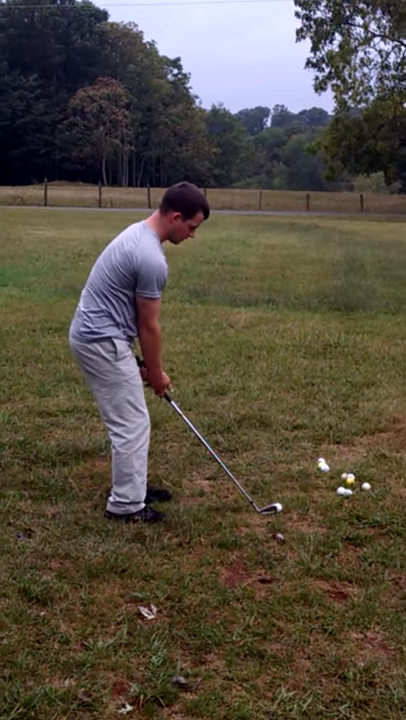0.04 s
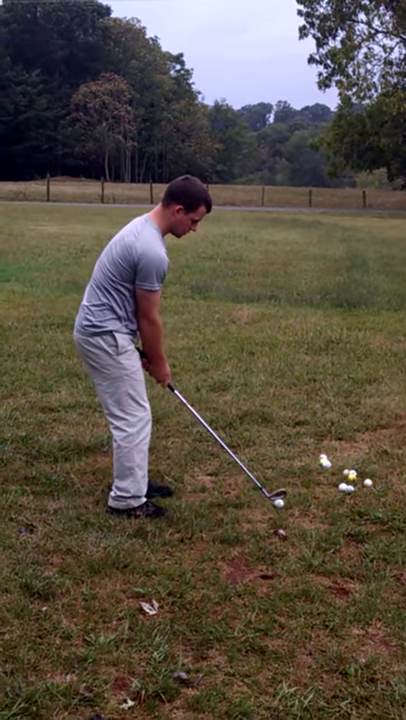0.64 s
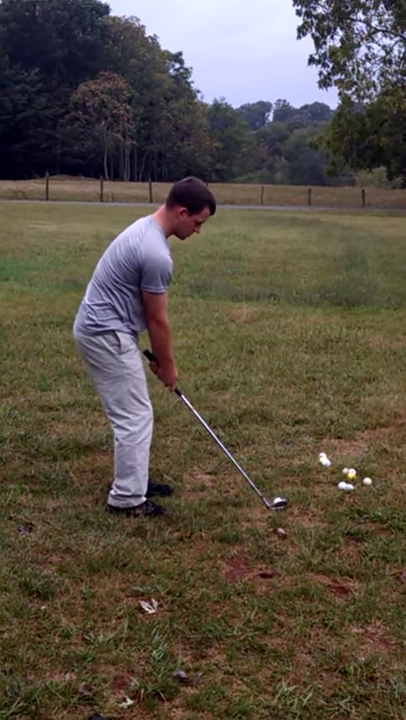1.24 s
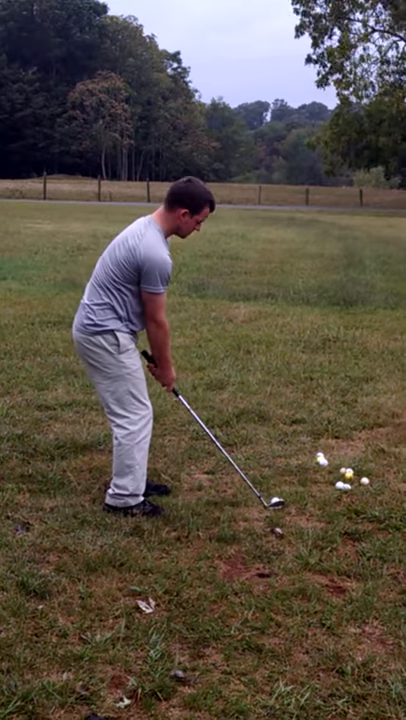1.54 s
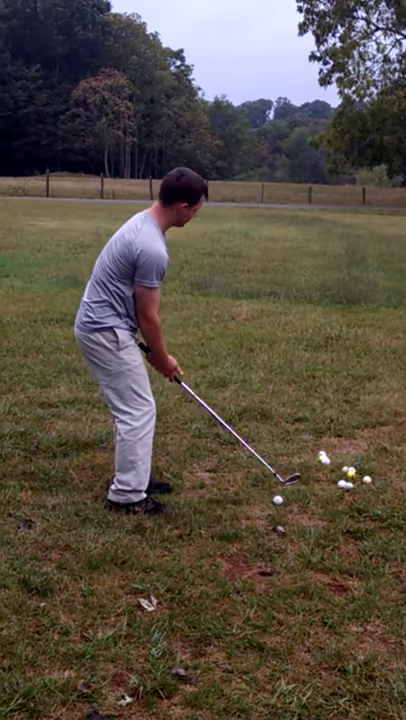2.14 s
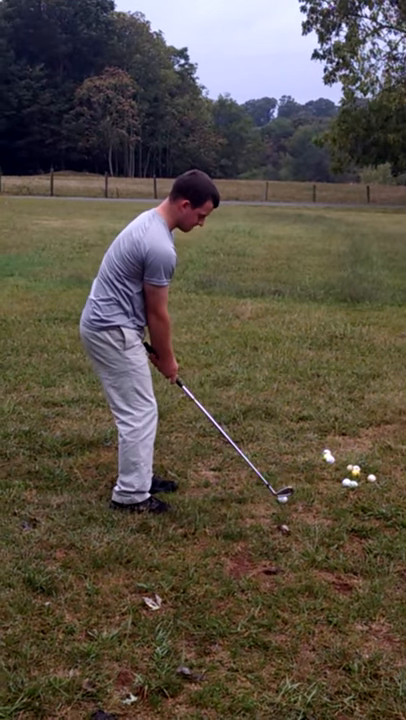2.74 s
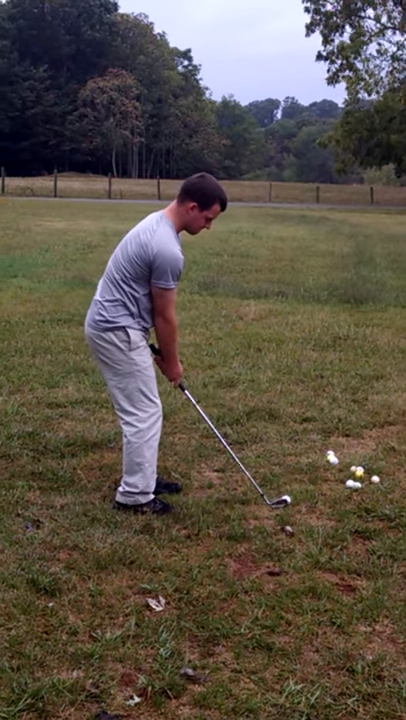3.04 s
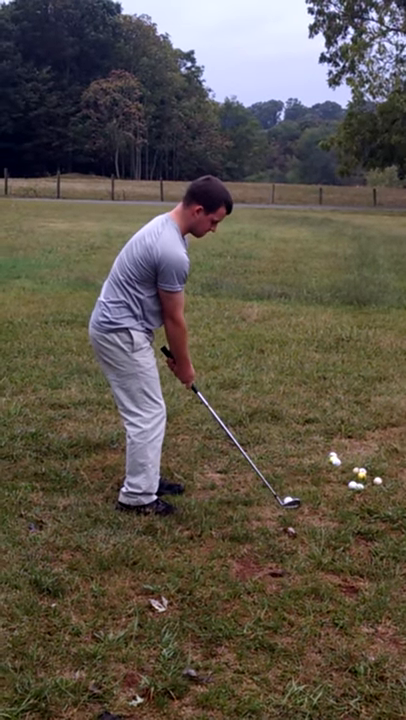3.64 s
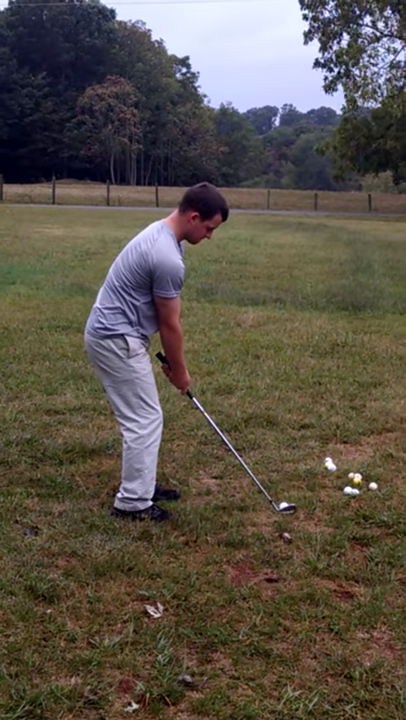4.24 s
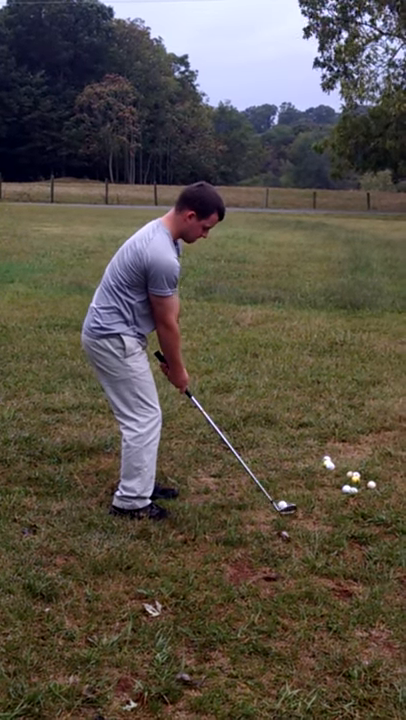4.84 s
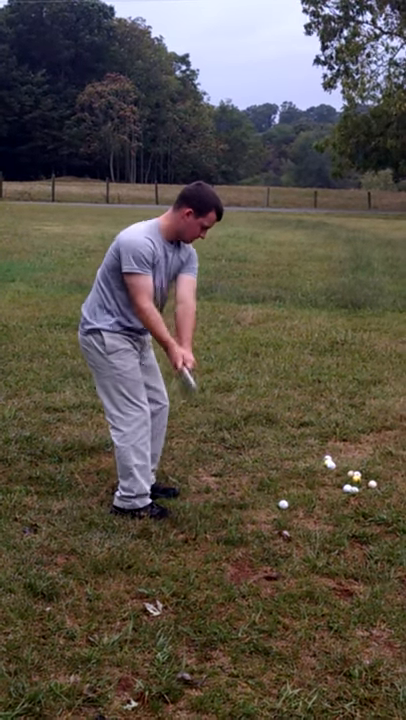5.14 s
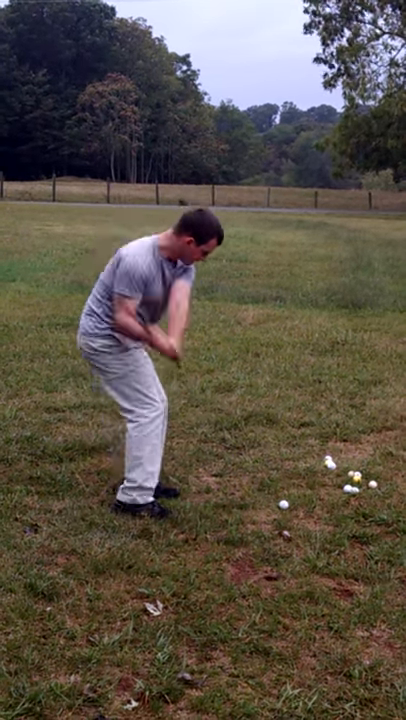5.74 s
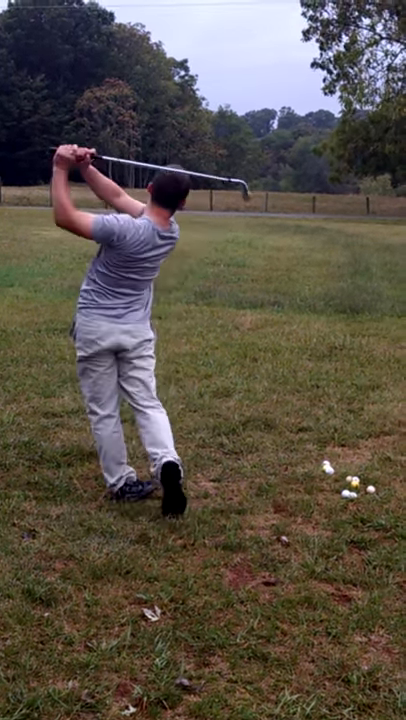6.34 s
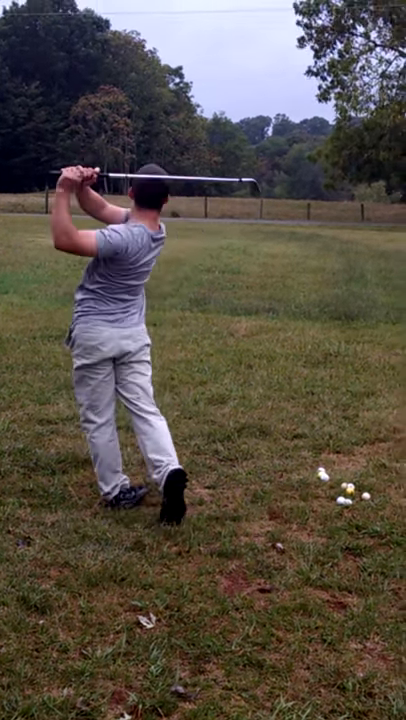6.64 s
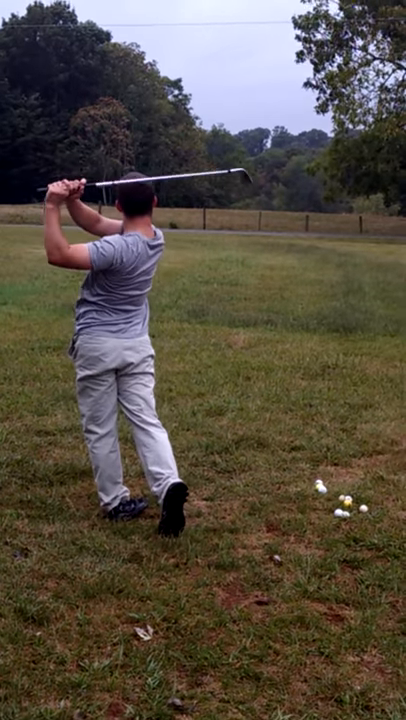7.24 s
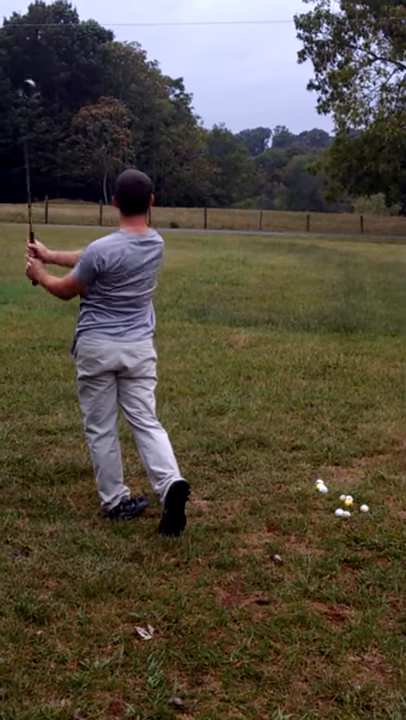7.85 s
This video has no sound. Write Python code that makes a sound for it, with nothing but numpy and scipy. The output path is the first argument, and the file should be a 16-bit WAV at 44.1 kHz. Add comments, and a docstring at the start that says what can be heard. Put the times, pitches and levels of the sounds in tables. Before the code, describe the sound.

Low wind rumbles on the microphone in an open meadow, with irregular gusts and soft thumps, strongest from about 0.5 to 1.5 seconds and returning around 3 and 5 seconds. Far behind it, trees hiss, insects shrill and a machine drones very faintly. A quiet cricket trills roughly every three quarters of a second. A small bird gives a thin, high chirp near 0.9 seconds and a few fainter ones later. Tiny dry ticks come at about 4.6, 5.3 and 6.5 seconds. At 5.9 seconds a golf club whooshes quickly a few metres away and strikes the ball: one loud, bright crack over a short hollow knock, with a brief tear of grass. The hit overloads the microphone, so the background drops at once, then creeps back with lighter wind until the end at about 8 seconds.

```python
"""A golfer swings an iron and strikes the ball on an open meadow, a few metres from a small camera.
The shaft whooshes in, the head tears the grass, and the strike cracks over a hollow knock. Far off,
trees hiss, a machine drones and insects shrill; a cricket sings nearer, a small bird calls thinly, dry
stalks and the grip tick. Wind rumbles on the microphone. The crack overloads the recorder, whose gain
ducks and creeps back."""
import sys
import numpy as np
from scipy import signal
from scipy.fft import rfft, irfft, next_fast_len
from scipy.io import wavfile
from scipy.ndimage import map_coordinates

SR = 44100
rng = np.random.default_rng(int(sys.argv[2]) if len(sys.argv) > 2 else 0)


def dump_mix(stems):
    """Bounce the given channels to the path in sys.argv[1] as a 16-bit WAV at rate SR."""
    frames = np.atleast_2d(stems).T  # one column per channel
    limited = np.clip(frames, -1, 1)  # hard clip at full scale
    pcm = np.round(limited * 32767).astype(np.int16)
    wavfile.write(sys.argv[1], SR, pcm)


N = 357210

# How the camera body shapes sound at its two microphone ports. Each row: frequency in Hz, left-right
# correlation, phase lead of the left in radians, pan in dB (left over right, here and below).
MIC_PORTS = [(200, 0.086, 0, -2), (700.05, 0.71, 0.2577, -1), (1207, 0.924, .5, -1.19),
             (1723, 0.96, 0, -1.2688), (2065, 1, -0.84, -3), (2394, 0.453, -2.5, -2), (2709, 0.99, -3, 0.5),
             (3057, 1, -3, -3.5), (3430, 0.626, -2, 3.9), (4042, 0.7089, -1.63, -3), (4700, 0.688, 0.6, 2),
             (5164, 0.4, 1.5, -1.5), (6070, 0.5, 3.5, 1.5), (7000, 0.0589, 7.5, -2),
             (7920, 0.7515, 8, 2.33), (8600, .1, 8, 0.5), (9480, 0.6, 12.5, -0.5), (10964, 0.646, 15, 1.37),
             (13151, 0.09707, 21, 0)]
# Distant trees and open air. Each row: frequency in Hz, relative density in dB.
TREE_SPECTRUM = [(30, -1), (120, -2.5), (340, -4.5), (500, -4.5), (750, -7), (1100, -6), (1400, -3.5),
                 (1700, 1.04), (2000, -0.5), (2400, -11), (2850, -12), (3400, -11.5), (4000, -11),
                 (6000, -13), (7300, -14.5), (9000, -17.5), (12500, -20.5), (15000, -28)]
# The breeze in those trees. Each row: time in seconds, level in dB.
TREE_LEVELS = [(0, -46.5), (1.5, -46.5), (3, -47), (4.2, -48.5), (5.5, -48), (6.5, -46.5), (8.1, -47.5)]
# Far insect choruses. Each row: centre in Hz, half-width in Hz, relative level in dB, pan in dB.
CHORUS_BANDS = [(4674, 270, -1, -1), (4958.4, 438, -3, -4.5), (6646.4, 167, -25.5, 0)]
# Their rise and fall. Each row: time in seconds, level in dB.
CHORUS_LEVELS = [(0, -57.5), (2.8, -56), (4.3, -60), (5.2, -58.5), (6.6, -54), (8.1, -54)]
# The nearer cricket's trills. Each row: start in seconds, level in dB.
CRICKET_TRILLS = [(0.28, -61), (1.04, -67), (1.71, -61), (2.59, -60.5), (3.34, -60.5), (4.16, -65.5),
                  (4.94, -61), (5.62, -61.5), (6.4, -63), (7.08, -62), (7.86, -64)]
# Bird notes from the trees. Each row: start in seconds, length in seconds, lowest pitch in Hz,
# level in dB, roughness as a share of the pitch.
BIRD_NOTES = [(0.9248, 0.0154, 7320, -45.5, 0.0085), (0.9387, 0.0168, 8230, -47, 0.0071),
              (1.907, 0.0829, 7311, -62, 0.01929), (2.301, 0.07, 6949, -57.5, 0.0101),
              (4.394, .074, 6959, -62, 0.007604), (7.615, 0.053, 7210, -58.5, 0.091)]
# The steady draught on the microphone. Each row: time in seconds, level in dB.
DRAUGHT_LEVELS = [(0, -28.5), (.45, -32), (1.0, -33.5), (1.9, -32), (2.4, -34.5), (3.72, -32.5),
                  (3.85, -48), (4.75, -45.5), (5.2, -36.5), (5.55, -41), (6.3, -36.5), (7.1, -44.5),
                  (8.1, -48)]
# Gusts on top of it. Each row: crest in seconds, level in dB, seconds to fall 10 dB (sign ignored).
WIND_GUSTS = [(.57, -16.5, -0.024), (.63, -25.5, -0.38), (.765, -40.5, 0.39), (.836, -21.5, 0.1857),
              (.888, -23, -0.02), (.965, -30.5, 0.07), (1.06, -22, 0.0755), (1.13, -21.5, 0.0222),
              (1.22, -20, 0.1116), (1.385, -23, 0.08), (1.47, -28, -0.04), (1.62, -30, -0.41),
              (2.58, -27.5, -0.01), (2.70, -31.5, 0.18), (2.78, -26.5, 0.0878), (2.88, -28.5, -0.0343),
              (3.03, -26, 0.14), (3.29, -25, 0.0726), (3.385, -30, 0.0732), (3.461, -28, 0.014),
              (3.54, -26.5, 0.07), (3.635, -30, 0.07), (3.895, -38.5, -0.25), (3.968, -31, -0.2652),
              (4.44, -25, -0.0478), (4.86, -27, 0.0469), (4.93, -24.5, 0.0438), (4.99, -24, 0.1161),
              (5.07, -30.5, 0.0875), (5.44, -37, 0.21), (5.62, -31.5, -0.02), (5.78, -34, 0.0285),
              (5.9, -34.5, -0.1), (6.08, -29.5, 0.1), (6.52, -33, 0.08), (6.81, -35, 0.07),
              (7.455, -34.5, 0.18), (7.71, -37, -0.06), (7.79, -38.5, 0.05)]
# Slow buffeting and finer turbulence at the ports. Each row: frequency in Hz, relative density in dB.
BUFFET_SPECTRUM = [(8, -54), (22, -0.5), (55, 1), (85, -4), (120, -9), (220, -50), (450, -63), (900, -100)]
TURBULENCE_SPECTRUM = [(40, -38), (120, -0.5), (200, -6.5), (300, -14.5), (480, -31), (900, -55.5),
                       (2000, -100)]
# Single eddies that thump the ports. Each row: time in seconds, peak in dB, width in seconds.
EDDY_THUMPS = [(.556, -10, 0.00245), (.56, -10.5, 0.0065), (0.583, -9.5, 0.00249), (.612, -7.5, 0.00594),
               (0.632, -12.5, 0.00273), (.653, -13, 0.0046), (.679, -13, 0.0053), (.756, -19.5, 0.0045),
               (.832, -12, 0.001884), (.838, -11.5, 0.00896), (.843, -16, 0.001756), (.853, -15, 0.00317),
               (.887, -14, 0.0034), (1.035, -17.5, 0.003631), (1.146, -15.5, 0.00868), (1.195, -12.5, .006),
               (1.213, -13.5, .004), (1.23, -8.5, 0.00271), (1.276, -16, 0.00458), (1.302, -14.5, .006),
               (1.349, -18, 0.005627), (1.399, -14, 0.00289), (1.461, -21, 0.0036), (1.595, -19.5, 0.0057),
               (2.02, -18.5, 0.00595), (2.171, -24.5, 0.0036), (2.187, -19, 0.00115), (2.191, -6, 0.00274),
               (2.729, -21, 0.00372), (2.833, -21, 0.0068), (2.965, -19.5, 0.0043), (3.026, -16.5, 0.0056),
               (3.067, -17, 0.0058), (3.213, -15.5, 0.0061), (3.286, -14, 0.00271), (3.301, -17, 0.0037),
               (3.341, -16, 0.0057), (3.519, -12.5, 0.0039), (3.535, -15.5, 0.00245),
               (3.549, -17.5, 0.00268), (4.02, -22.5, 0.0071), (4.429, -18, 0.00274),
               (4.453, -15.5, 0.00344), (4.9, -13, 0.00447), (4.913, -14.5, 0.00455),
               (4.945, -12, 0.003219), (5.834, -20, 0.0072), (6.265, -20.5, 0.0073), (6.659, -12.5, 0.0094),
               (7.507, -25, 0.007137), (7.73, -23.5, 0.0069)]
# Ticks of dry stalks and the grip. Each row: start in seconds, level in dB, pitch in Hz, t60 in seconds.
TICKS = [(4.553, -6.5, 8050, 0.000242), (4.554, -51.5, 1400, 0.002966), (5.336, -31.5, 1751, 0.00393),
         (5.3384, -25.5, 1894, 0.0045), (6.541, -24.5, 1892, 0.00148)]
# Air rushing past the club, and grass tearing. Each row: frequency in Hz, relative density in dB.
RUSH_SPECTRUM = [(100, -28), (300, -2), (600, -5), (1150, -7), (1600, 0), (1950, 2.5), (2400, -18),
                 (3200, -17), (8000, -62)]
GRASS_SPECTRUM = [(1000, -18.5), (2500, 6), (4000, -1.5), (5100, 0), (5900, -7.5), (7200, -3.5),
                  (10000, -8.5), (13000, -9), (16000, -34.5)]
# The bright crack of the club face. Each row: frequency in Hz, relative density in dB.
CRACK_SPECTRUM = [(300, -19.5), (900, 8), (1700, 0.5), (2800, -3.5), (4200, -3.5), (5300, -3.5),
                  (6800, -11), (8100, -12), (9400, -4.5), (10400, -13.5), (13000, -14), (16000, -19.5)]
# The strike's tone: a low hollow knock coloured by the ground, with club and ball ringing above.
# Each row: frequency in Hz, level in dB, t60 in seconds, pan in dB.
STRIKE_TONE = [(485, -11.5, .011, 2.5), (610, -16.5, .014, 0), (795, -19, .028, 2), (1000, -23, .028, 1),
               (1590, -19.5, 0.013, 5.5), (1752, -6.5, .015, 1), (1911.4, -3, 0.01197, -3.5),
               (2110, -7.5, 0.0106, -9), (2950, -15.5, .007, -3.5), (3734, -18.5, 0.0125, 9.5),
               (5217.8, -14, 0.0109, -5.5), (6440, -11, .0055, -1.5), (6980, -9.5, .0055, 9.5),
               (9380, -1.5, .004, 1), (11550, -13.5, .007, 3.5)]
# The strike on turf and ball, then fainter echoes and bits of turf landing. Each row: start in seconds,
# gain in dB, relative level of the crack in dB, low-pass cutoff in Hz.
STRIKE_EVENTS = [(5.9262, -14, -8.5, 1500), (5.9291, -15, -1.5, 7020), (5.9306, 5.5, -5.5, 19000),
                 (5.951, -20, -12.5, 5000), (5.968, -27, -17, 3002), (5.9887, -24.5, -20, 3003)]

TIME = np.arange(N) / SR
SPLIT = np.array([[.5], [-.5]])  # shares a level or phase gap between left and right
OPPOSED = np.array([[1], [-1]])  # the right channel in opposite polarity


def amp(db):
    """Decibels to gain."""
    return 10 ** (np.asarray(db) / 20)


def unit(x):
    """Scale to rms 1."""
    return x / np.sqrt(np.mean(x ** 2) + 1e-20)


def along(rows, hz, column=1):
    """One column of a frequency table, read on a log axis."""
    columns = np.transpose(rows)
    return np.interp(np.log(hz + 1), np.log(columns[0] + 1), columns[column])


def level_curve(rows):
    """A table of times and levels as one level per sample."""
    return np.interp(TIME, *np.transpose(rows))


def wobble(rate):
    """A smooth random curve, rate knots a second."""
    knots = rng.standard_normal(int(N * rate / SR) + 4)
    return map_coordinates(knots, [TIME * rate])


def swell(crest_s, rise_db_per_s, fall_db_per_s):
    """A gain that climbs to 1 at the crest and dies away after it."""
    t = TIME - crest_s
    return amp(-np.abs(t) * np.where(t < 0, rise_db_per_s, fall_db_per_s))


def tone(hz):
    """A sine of rms 1 that follows a pitch given for each sample."""
    return np.sqrt(2) * np.sin(2 * np.pi * np.cumsum(hz) / SR)


def filtered(x, response):
    """x times a response of frequency."""
    size = next_fast_len(N + SR // 2)
    return irfft(rfft(x, size) * response(np.fft.rfftfreq(size, 1 / SR)), size)[..., :N]


def noise(spectrum):
    """Coloured noise of rms 1."""
    return unit(filtered(rng.standard_normal(N), lambda hz: amp(along(spectrum, hz))))


def placed(x, pan_db, lead_ms):
    """A sound that is louder and earlier on the left by these amounts."""
    return amp(SPLIT * pan_db) * filtered(x, lambda hz: np.exp(2j * np.pi * hz * SPLIT * lead_ms / 1000))


def through_ports(x):
    """Direct sound at the microphone: the camera body delays each frequency by its own amount."""
    return filtered(x, lambda hz: np.exp(1j * SPLIT * along(MIC_PORTS, hz, column=2)))


def diffuse(spectrum):
    """Stereo noise of rms 1 that reaches the microphone from all sides."""
    mid = filtered(noise(spectrum), lambda hz: np.sqrt((1 + along(MIC_PORTS, hz)) / 2))
    side = filtered(noise(spectrum), lambda hz: np.sqrt((1 - along(MIC_PORTS, hz)) / 2))
    ports = through_ports([mid + side, mid - side])
    return unit(filtered(ports, lambda hz: amp(SPLIT * along(MIC_PORTS, hz, column=3))))


def far_machine(hz=360, waver_hz=10, level_db=-67):
    """The faint, wavering drone of a machine a long way off."""
    return amp(level_db + 2.5 * wobble(7.1)) * tone(hz + waver_hz * wobble(17))


def trees():
    """The breeze hisses in distant trees all round the microphone."""
    return amp(level_curve(TREE_LEVELS) + 0.827 * wobble(6.5)) * diffuse(TREE_SPECTRUM)


def insect_choruses(trim_db=-3):
    """Far across the meadow, many insects blur into narrow bands of noise."""
    level_db = level_curve(CHORUS_LEVELS) + trim_db
    chorus = np.zeros((2, N))
    for centre, width, db, pan_db in CHORUS_BANDS:
        band = unit(filtered(rng.standard_normal(N), lambda hz: 0.25 ** (((hz - centre) / width) ** 2)))
        chorus += amp(level_db + db + 0.59 * wobble(16)) * placed(band, pan_db, lead_ms=0.0283)
    return chorus


def cricket(hz=5290, waver_hz=45, strokes_per_s=23.4, trill_s=0.2368, fade_s=0.04):
    """One nearer cricket, right of the microphone, sings trills of five or six wing strokes."""
    trills = np.zeros(N)
    for start, db in CRICKET_TRILLS:
        to_edge_s = np.minimum(TIME - start, start + trill_s - TIME)
        trills += amp(db) * np.clip(to_edge_s / fade_s, 0, 1)
    strokes = (1 - np.cos(2 * np.pi * strokes_per_s * TIME)) / 2
    wings = tone(hz + waver_hz * wobble(60)) * amp(0.899 * wobble(26))
    return placed(trills * strokes * wings, pan_db=-8, lead_ms=0.02375)


def bird(start_hz=10800, end_hz=8920, throat_hz=8560, throat_width_hz=420, throat_db=5.5, flutter_db=3):
    """Thin notes from the trees to the left scoop down and partly back up; a rough one buzzes."""
    calls, jitter = np.zeros(N), wobble(1500)
    for start, length, low_hz, db, roughness in BIRD_NOTES:
        u = np.clip(2 * (TIME - start) / length - 1, -1, 1)  # -1 to 1 across the note
        top_hz = np.where(u < 0, start_hz, end_hz)
        hz = low_hz + (top_hz - low_hz) * np.abs(u) ** 1.8  # a higher power flattens the scoop
        resonance_db = throat_db * np.exp(-((hz - throat_hz) / throat_width_hz) ** 2)
        calls += amp(db + resonance_db) * (1 - u ** 4) * tone(hz * (1 + roughness * jitter))
    return placed(calls * amp(flutter_db * wobble(200)), pan_db=3.5, lead_ms=0.0334)


def wind_level(rise_share=0.703):
    """Wind strength in dB: each gust builds faster than it dies and adds its power to the draught."""
    power = amp(level_curve(DRAUGHT_LEVELS)) ** 2
    for crest, db, fall_s in WIND_GUSTS:
        u = (TIME - crest) / np.where(TIME < crest, rise_share * fall_s, fall_s)
        power += amp(db - 10 * u * u) ** 2
    return 10 * np.log10(power)


def wind_on_microphone(strong_db=-20, turbulence_db=-11, growth=1.726, flutter_db=2, common_db=-23):
    """Wind rumbles wide, left and right in opposite polarity; strong gusts add finer turbulence."""
    level_db = wind_level() + flutter_db * wobble(21)
    fine_db = strong_db + turbulence_db + growth * (level_db - strong_db) + flutter_db * wobble(24.912)
    rumble = amp(level_db) * noise(BUFFET_SPECTRUM) + amp(fine_db) * noise(TURBULENCE_SPECTRUM)
    for centre, db, width in EDDY_THUMPS:
        u = (TIME - centre) / width
        rumble += amp(db) * (1 - 2 * u * u) * np.exp(-u * u)  # one pulse with a dip on either side
    common = amp(level_db + common_db) * noise(BUFFET_SPECTRUM)  # the same in both channels
    return placed(rumble, pan_db=1, lead_ms=0.3414) * OPPOSED + common


def stalk_and_grip_ticks(splinter_db=-23, splinter_t60=0.0073, cutoff_hz=12800):
    """Each tick is a few cycles of ringing with a trace of splintering behind it."""
    ticks = np.zeros(N)
    for start, db, hz, t60 in TICKS:
        t = np.maximum(TIME - start, 0)
        ring = np.sin(2 * np.pi * hz * t) * amp(-60 * t / t60)
        splinters = (t > 0) * amp(splinter_db - 60 * t / splinter_t60) * rng.standard_normal(N)
        ticks += amp(db) * (ring + splinters)
    ticks = filtered(ticks, lambda hz: 1 / np.sqrt(1 + (hz / cutoff_hz) ** 12))
    return placed(ticks, pan_db=1, lead_ms=0.355) * OPPOSED


def shaft_whistle(crest_s=5.908, width_s=0.008, level_db=-29, crest_hz=1854, rise_hz_per_s=20000):
    """The shaft sheds uneven vortices: a brief, ragged tone that rises as the club accelerates."""
    t = TIME - crest_s
    hz = crest_hz + rise_hz_per_s * t + 130 * wobble(700)
    return through_ports(amp(level_db) * np.exp(-(t / width_s) ** 2) * tone(hz))


def swing(rush_db=-35.5, grass_db=-35.5):
    """A few metres off, air rushes past the club, the shaft whistles and the head rips the grass."""
    rush = swell(crest_s=5.911, rise_db_per_s=254, fall_db_per_s=127.5) * diffuse(RUSH_SPECTRUM)
    grass = swell(crest_s=5.94, rise_db_per_s=269, fall_db_per_s=267.5) * diffuse(GRASS_SPECTRUM)
    return amp(rush_db) * rush + shaft_whistle() + amp(grass_db + 1.4 * wobble(600)) * grass


def strike(crack_t60=0.0055, attack_s=0.000506, radiate_hz=320):
    """The strike cracks over a hollow, ringing knock; duller echoes and falling bits of turf follow."""
    t = np.arange(SR // 10) / SR
    knock = sum(amp(db + SPLIT * pan_db - 60 * t / t60) * np.sin(2 * np.pi * hz * t)
                for hz, db, t60, pan_db in STRIKE_TONE)
    knocks, cracks = np.zeros((2, N)), np.zeros((2, N))
    for start, db, crack_db, cutoff_hz in STRIKE_EVENTS:
        soften = signal.butter(1, cutoff_hz, fs=SR, output="sos")
        onset = amp(db) * (1 - np.exp(-t / attack_s))
        crack = amp(crack_db - 60 * t / crack_t60) * diffuse(CRACK_SPECTRUM)[:, :len(t)]
        first = round(start * SR)
        knocks[:, first:first + len(t)] += signal.sosfilt(soften, onset * knock)
        cracks[:, first:first + len(t)] += signal.sosfilt(soften, onset * crack)
    # the strike carries no deep bass
    low_cut = signal.butter(2, radiate_hz, "highpass", fs=SR, output="sos")
    return signal.sosfilt(low_cut, cracks - through_ports(knocks))


def scene():
    """The windy meadow and the golfer, as they reach the microphone."""
    meadow = far_machine() + trees() + insect_choruses() + cricket() + bird()
    return meadow + wind_on_microphone() + stalk_and_grip_ticks() + swing() + strike()


def gain_control(x, range_db=11.5, hold_s=0.454, release_db_per_s=10.5, smoothing_s=0.0827):
    """An overload pulls the recorder's gain down; after a hold it creeps back."""
    overload = np.abs(x).max(axis=0) > 1
    since_overload_s = TIME - np.maximum.accumulate(np.where(overload, TIME, -np.inf))
    duck_db = np.clip(range_db - release_db_per_s * (since_overload_s - hold_s), 0, range_db)
    pole = np.exp(-1 / (smoothing_s * SR))
    return x * amp(-signal.lfilter([1 - pole], [1, -pole], duck_db))


def record(dry):
    """The camera ducks its gain, clips at full scale and keeps nothing above 15.8 kHz."""
    clipped = np.clip(gain_control(dry), -1, 1)
    return filtered(clipped, lambda hz: hz < 15800)


dry = scene()
out = record(dry)
dump_mix(out)
```